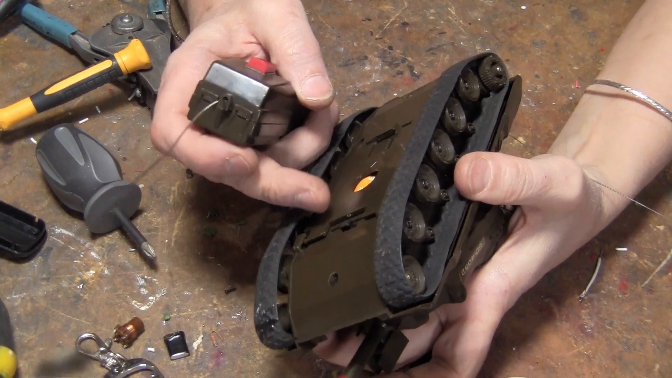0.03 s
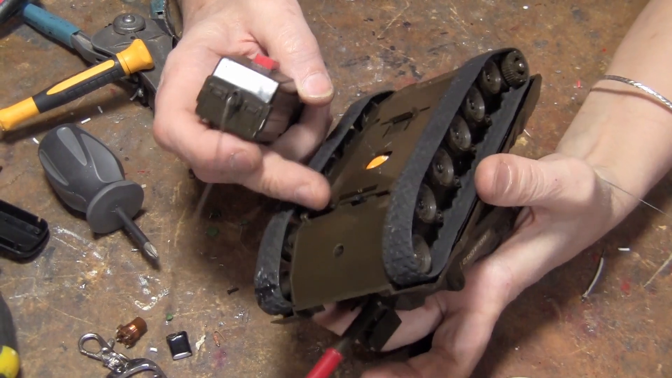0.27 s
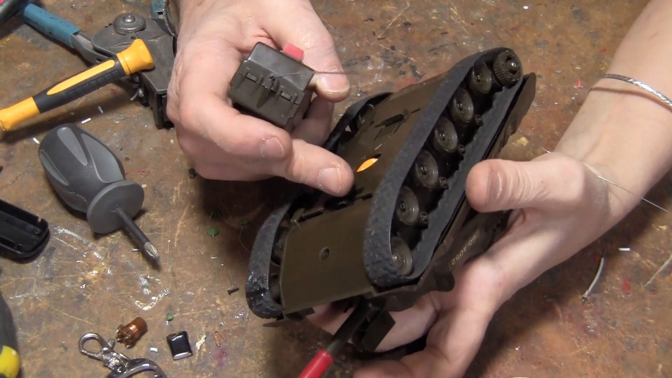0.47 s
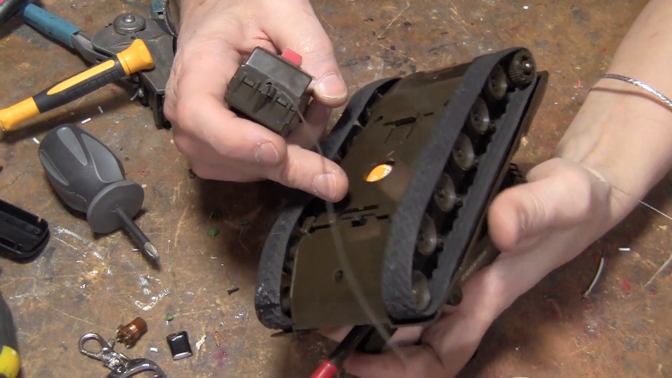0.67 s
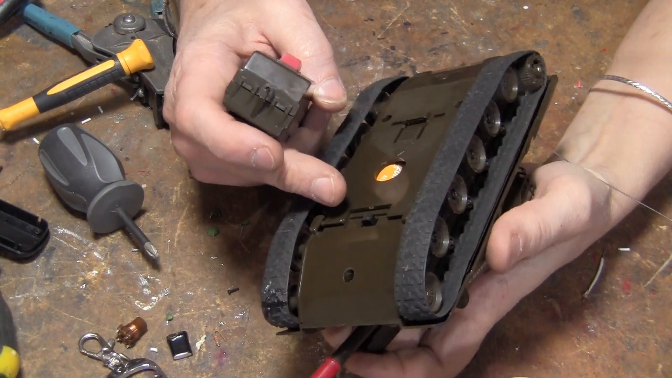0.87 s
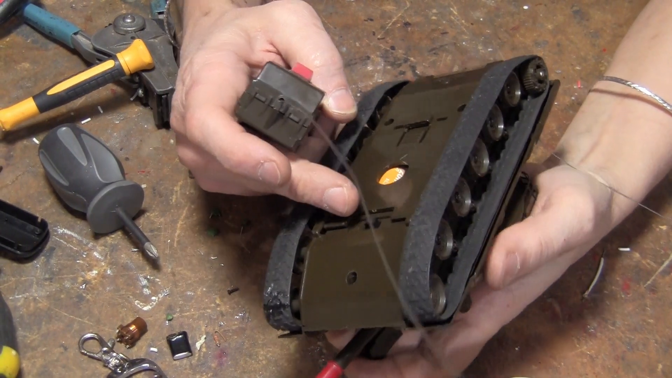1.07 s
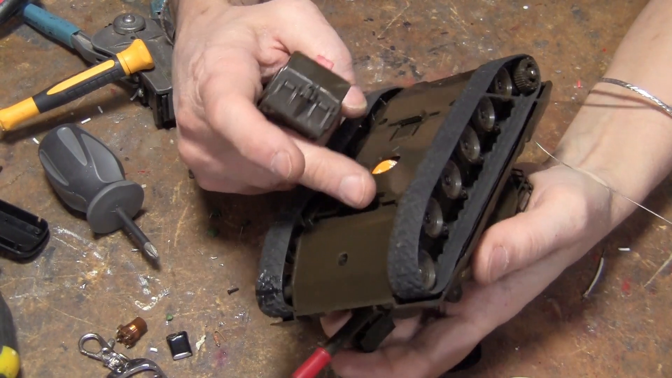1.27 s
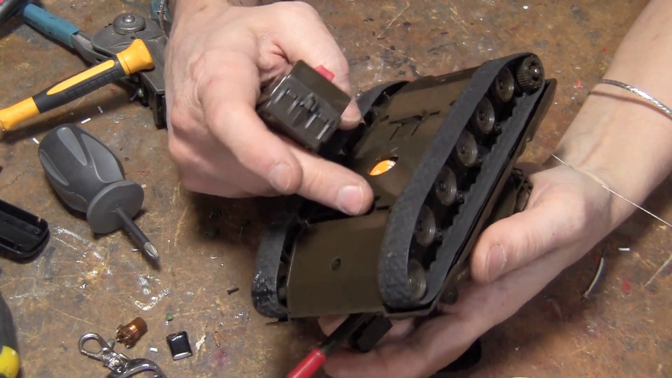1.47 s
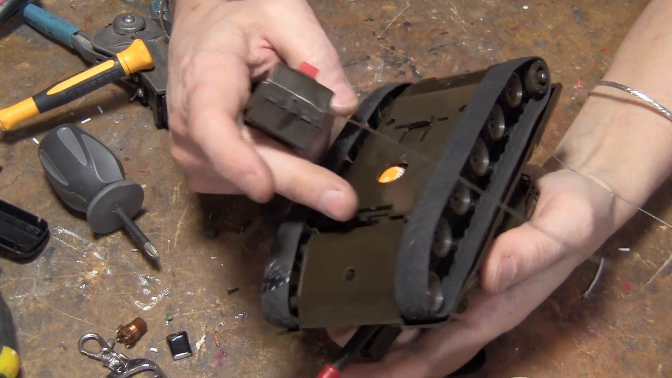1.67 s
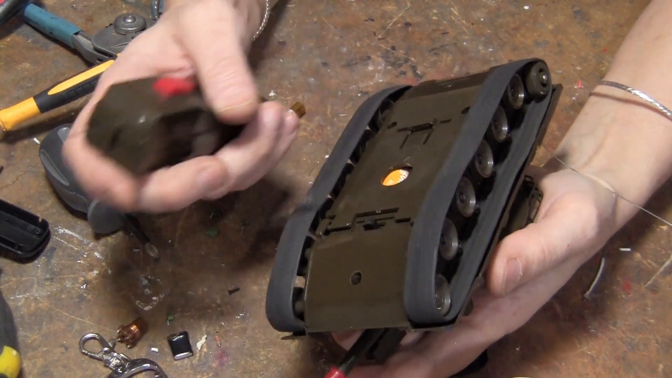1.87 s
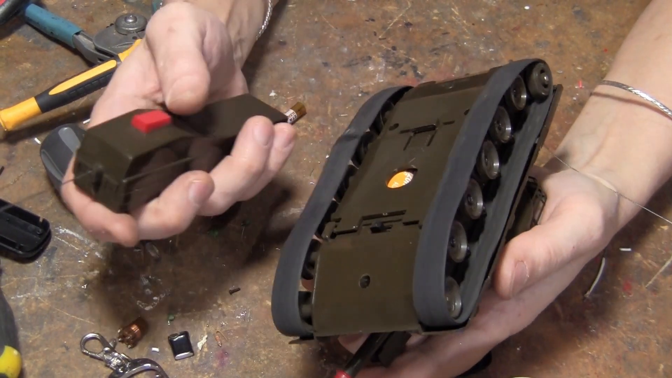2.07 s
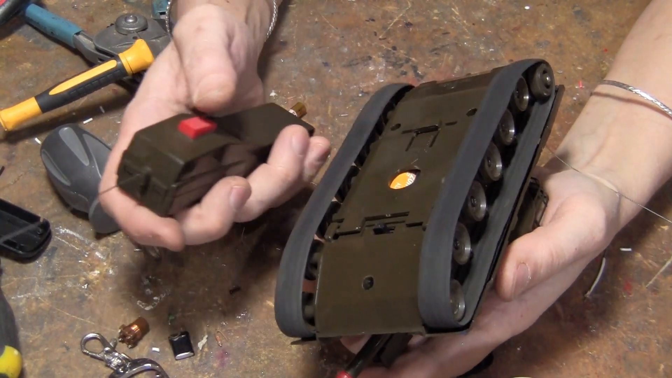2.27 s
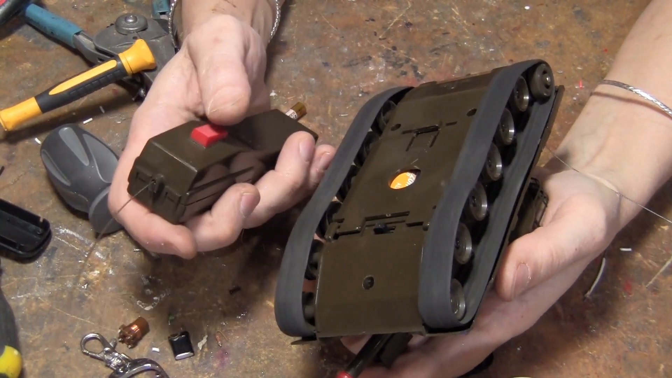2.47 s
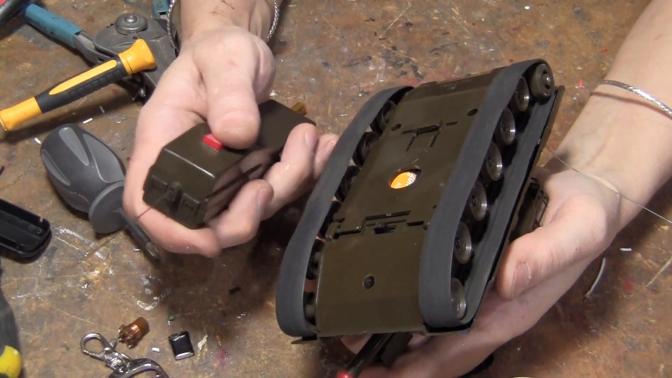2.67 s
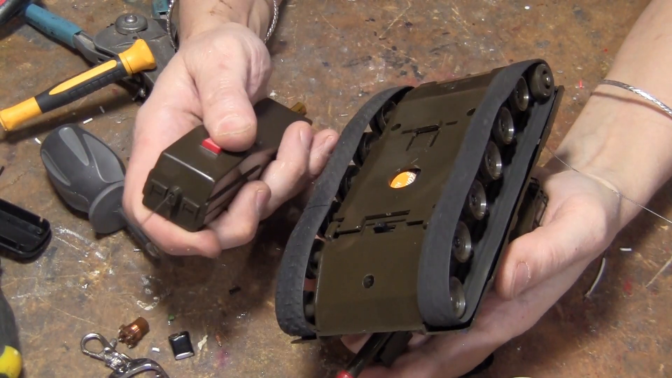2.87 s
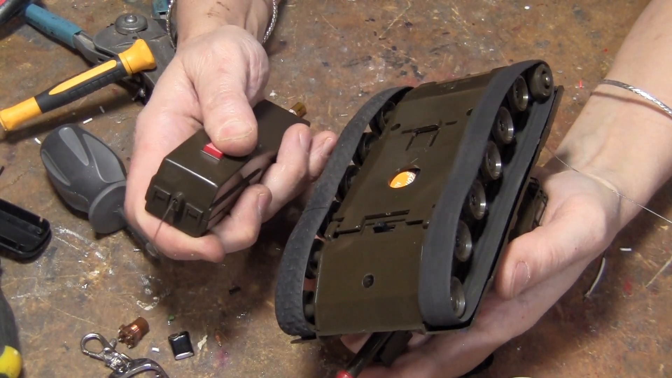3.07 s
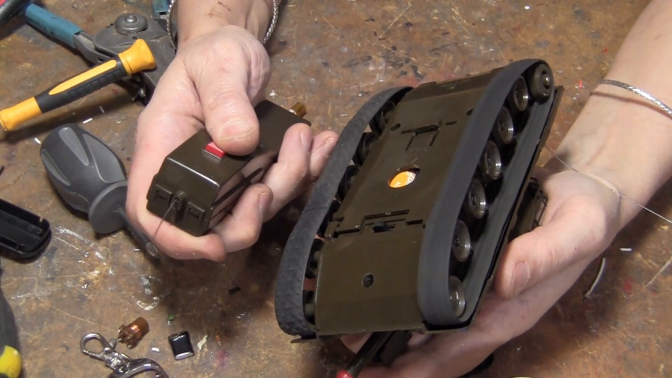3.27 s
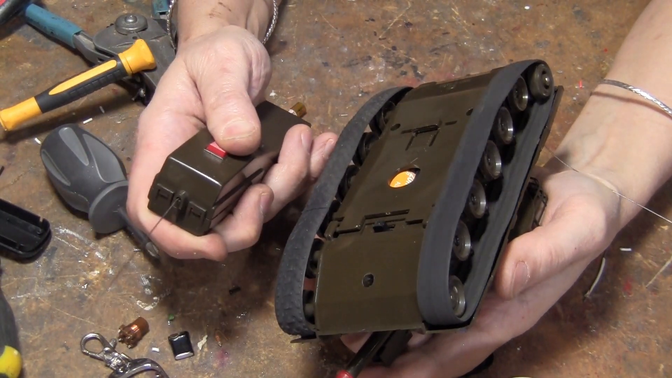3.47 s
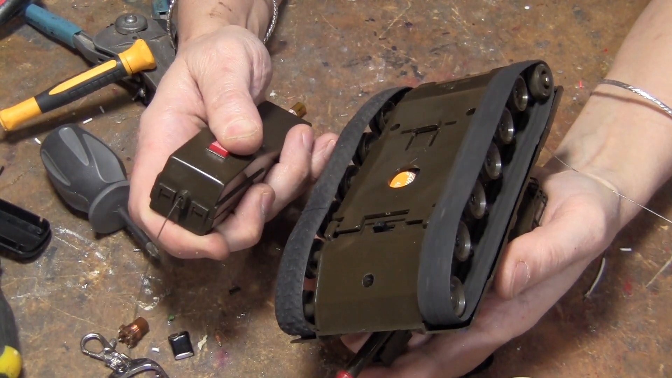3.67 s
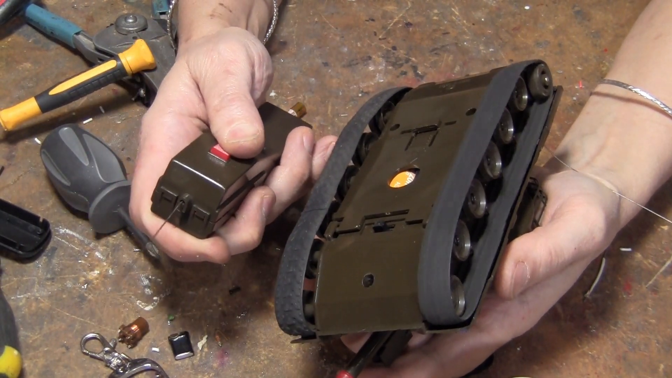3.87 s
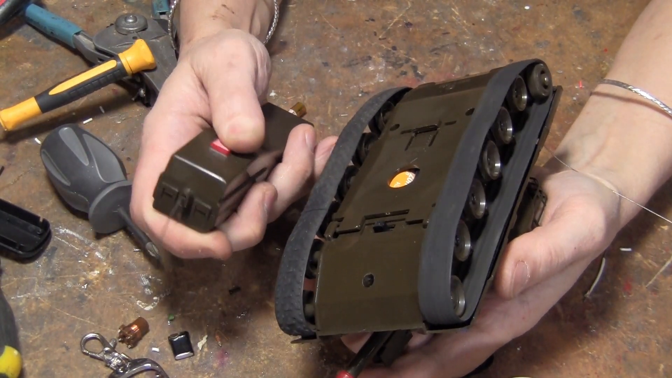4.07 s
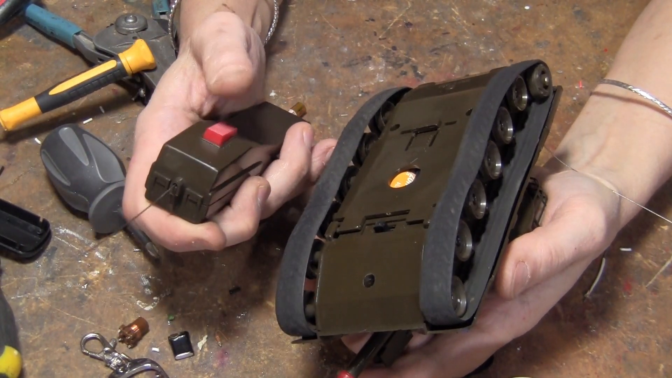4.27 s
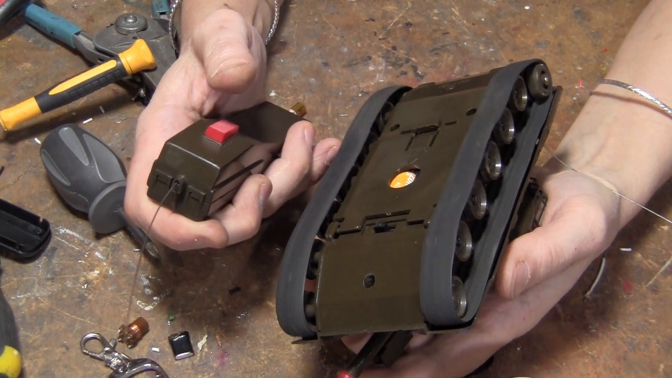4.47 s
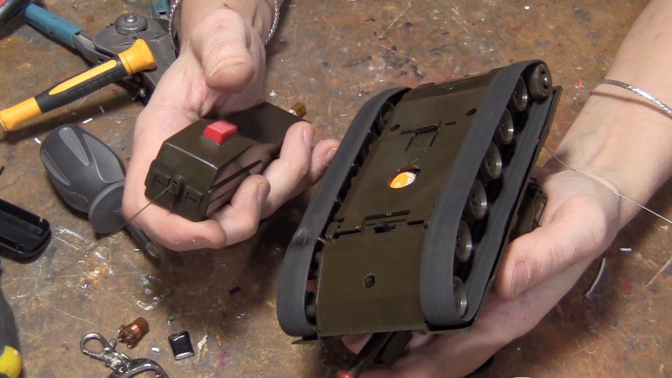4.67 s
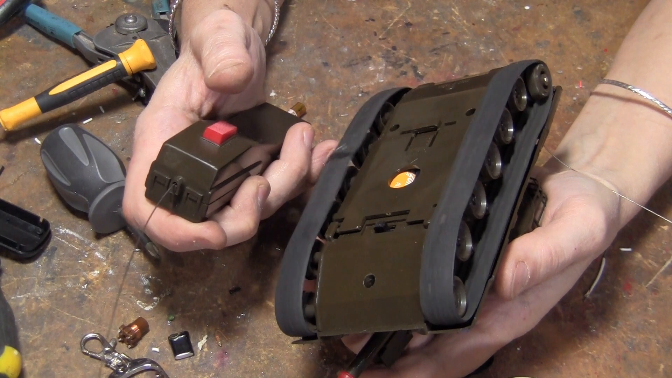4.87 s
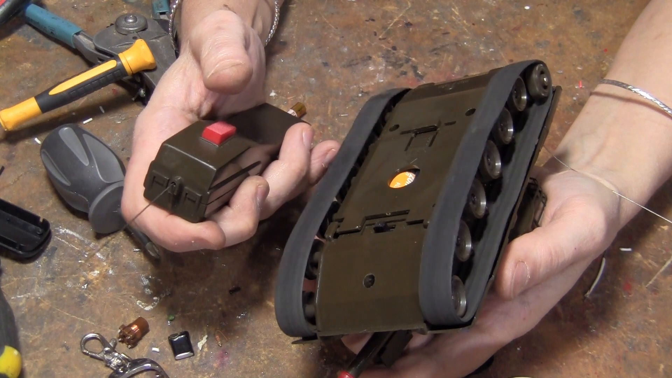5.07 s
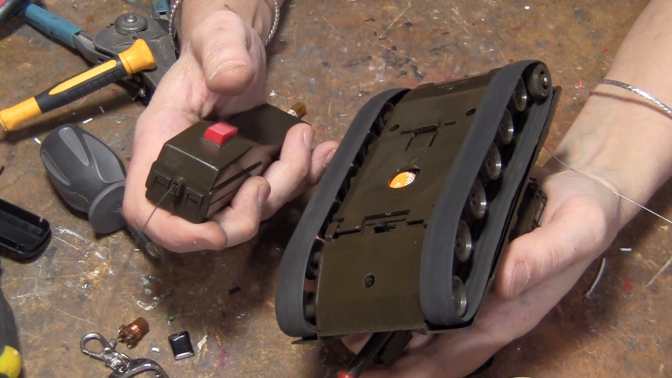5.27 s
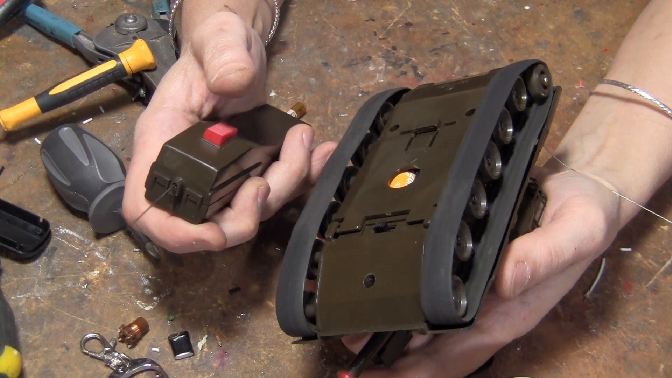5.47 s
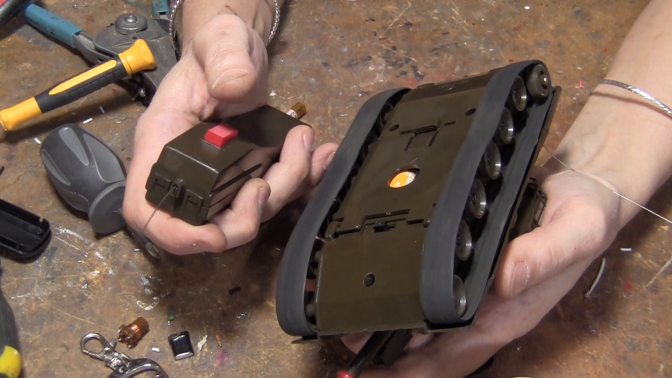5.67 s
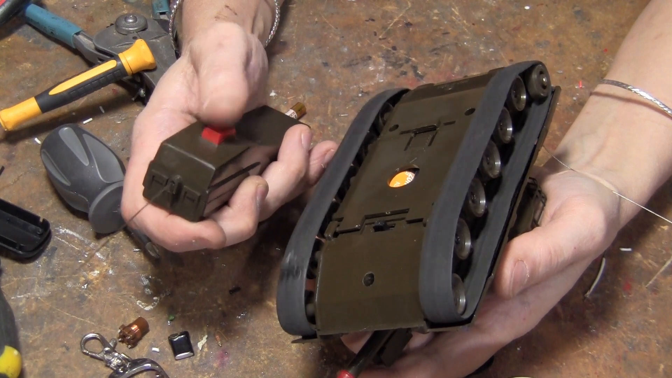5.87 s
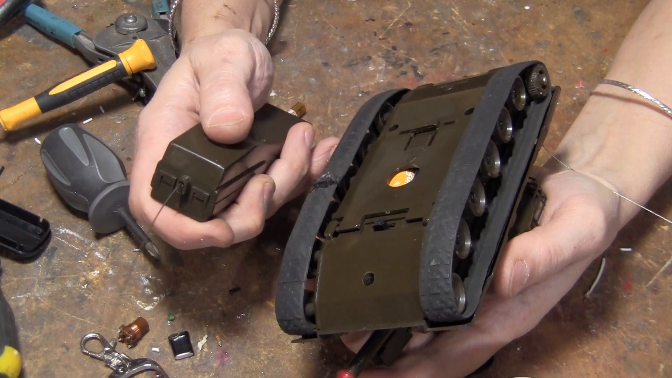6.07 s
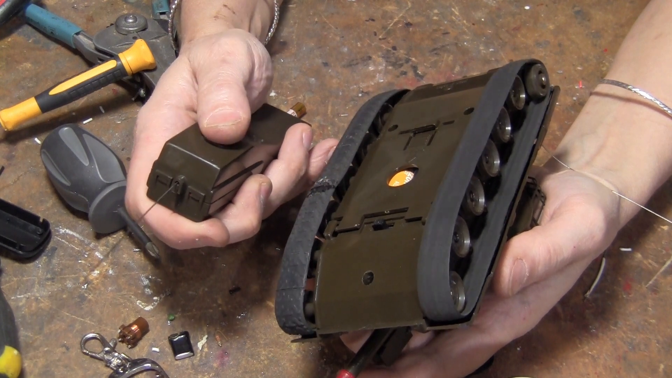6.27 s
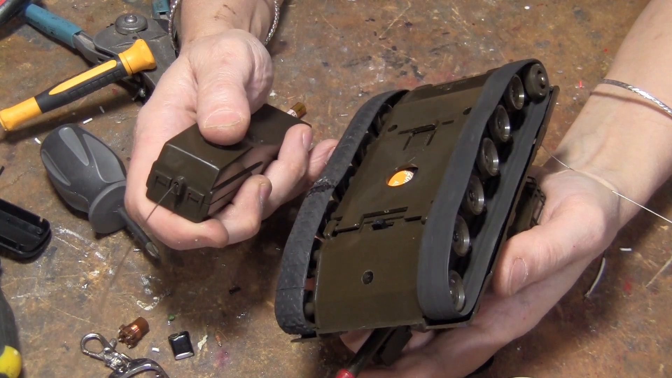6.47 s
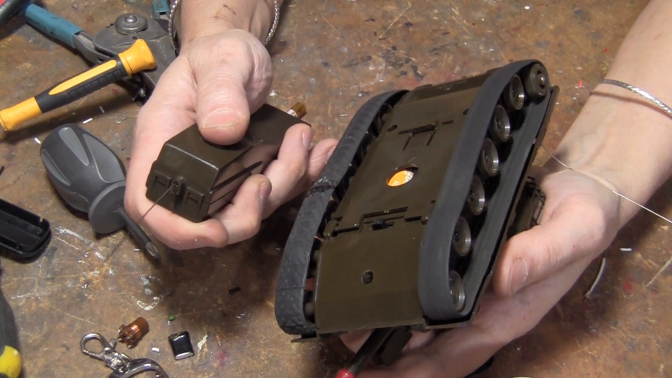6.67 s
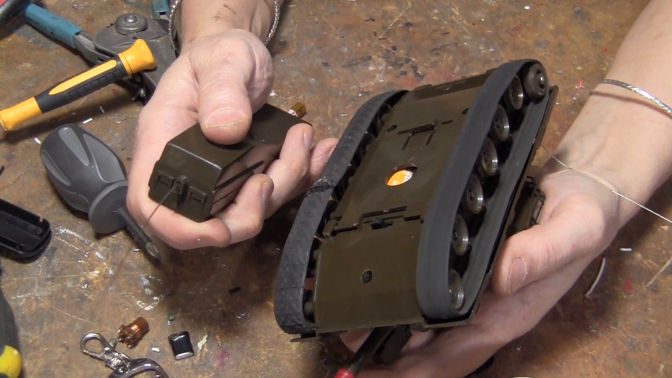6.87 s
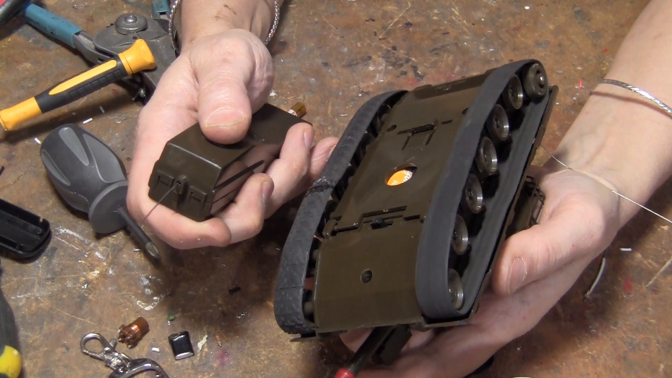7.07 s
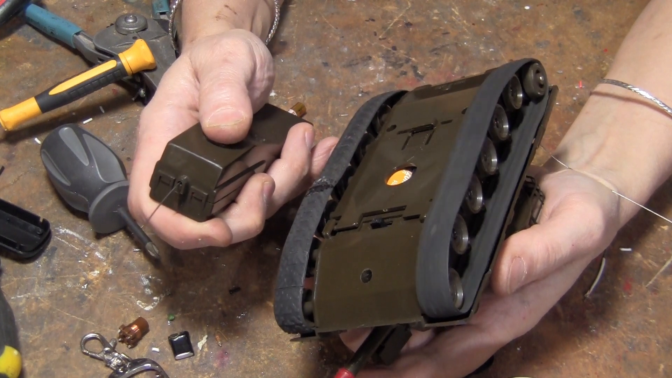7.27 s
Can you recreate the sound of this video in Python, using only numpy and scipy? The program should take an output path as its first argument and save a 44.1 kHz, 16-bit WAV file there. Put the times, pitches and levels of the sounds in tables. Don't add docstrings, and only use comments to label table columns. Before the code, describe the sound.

Close, dry handling clicks and a tiny squeak lead into whining, rattling little motors that tick sharply one way and softly in reverse.

```python
import sys
import numpy as np
from scipy import signal
from scipy.fft import rfft, irfft, next_fast_len
from scipy.io import wavfile
from scipy.ndimage import uniform_filter1d, map_coordinates

SR = 44100
rng = np.random.default_rng(int(sys.argv[2]) if len(sys.argv) > 2 else 0)


def magnitude_from_level(level_db):
    exponent = np.asarray(level_db, float) / 20
    return 10 ** exponent


def to_wav(sig):
    pcm = np.clip(np.atleast_2d(sig), -1, 1) * 32767
    pcm = np.round(pcm).astype(np.int16)
    wavfile.write(sys.argv[1], SR, pcm.T)


N = 323649
T = np.arange(N) / SR

# [start t/s, stop t/s, hull rattle level/dB, speed at the first bite f/Hz, rise time t/s]
RUNS = [
    (1.611, 2.776, -37, 30, .13),
    (2.812, 4.256, -38.5, 81.97, 0.078),
    (4.285, 6.113, -39, 62.13, 0.045),
    (6.15, 7.4, -37.5, 104, 0.072),
]
# [t/s, peak level/dB]
HARD_SNAPS = [(1.7347, -10.5), (1.847, -13.5), (1.9216, -15), (1.9893, -17), (2.0623, -15), (2.1314, -17.5),
              (2.1948, -15.5), (2.2591, -15.5), (2.3163, -18), (2.3695, -15.5), (2.4304, -20), (2.496, -18),
              (2.5572, -16), (2.6255, -20.5), (2.6939, -16), (2.758, -17.5)]
HARD_SNAPS_AGAIN = [(4.4257, -12), (4.5023, -13.5), (4.5686, -16), (4.631, -17), (4.6916, -16.5),
                    (4.753, -18.5), (4.8156, -18), (4.8795, -17.5), (4.9495, -18), (5.0176, -16.5),
                    (5.0831, -17.5), (5.1491, -18.5), (5.2122, -17), (5.2708, -16.5), (5.3337, -18),
                    (5.3961, -18.5), (5.4554, -17), (5.5233, -15.5), (5.5962, -18), (5.66, -17),
                    (5.7273, -17), (5.7938, -19.5), (5.852, -17), (5.914, -16.5), (5.9801, -16.5),
                    (6.039, -17), (6.106, -19.5)]


def unit(x):
    return x / np.sqrt(np.mean(x ** 2) + 1e-20)


def along(points, hz):
    f, db = np.transpose(points)
    return magnitude_from_level(np.interp(np.log(hz + 1), np.log(f), db, left=-120, right=-120))


def wobble(rate):
    return map_coordinates(rng.standard_normal(int(N * rate / SR) + 4), [T * rate])


def noise():
    return rng.standard_normal(N)


def filtered(x, response):
    m = next_fast_len(N + 8192)
    return irfft(rfft(x, m) * response(np.fft.rfftfreq(m, 1 / SR)), m)[:N]


def add(track, s, sound):
    part = track[round(s * SR):][:len(sound)]
    part += sound[:len(part)]


def decay(t, t60):
    return magnitude_from_level(-60 * t / t60)


def room():
    # [f/Hz, level/dB per Hz]
    room_tone = [(12, -41.5), (20, -3.5), (63, -7), (135, -28.5), (151, -34), (184, -18.5), (206, -31),
                 (244, -36), (273, -28), (551, -32), (1110, -36.5), (2510, -45), (10800, -56),
                 (14700, -44.5), (16500, -56)]
    air = magnitude_from_level(-63 + 1.4 * wobble(3.075)) * unit(filtered(noise(), lambda f: along(room_tone, f)))
    mains = magnitude_from_level(-68.5 + 3.0 * wobble(6)) * np.sin(2 * np.pi * 59.75 * T)
    return air + mains


def arch(s, length):
    return np.sin(np.pi * np.clip((T - s) / length, 0, 1)) ** 2


def rubbing():
    # [start t/s, length t/s, panel level/dB, scuff level over it/dB]
    strokes = [(-.12, .31, -58, -2.5), (0.129, 0.12, -46, -7.5), (0.221, 0.19, -60, -4),
               (.385, 0.046, -52, -8), (0.502, 0.125, -71, -12.5), (0.661, 0.33, -57.5, -11.5),
               (0.941, 0.365, -73, -9), (1.079, 0.18, -61, -8.5), (1.276, 0.16, -76, -5),
               (1.462, 0.102, -73, 11.5)]
    # [start t/s, length t/s, level/dB]
    palm_shifts = [
        (-.08, 0.27, -61.5),
        (0.258, 0.13, -60),
    ]
    # [f/Hz, level/dB per Hz]
    panel_tone = [(150, -46), (250, -8.5), (671, -10), (844, 2.5), (1400, 2), (2790, -24), (3000, -20),
                  (3900, -43), (6600, -120)]
    scuff_tone = [(1290, -22), (2200, -3), (2800, -10), (3950, -7.5), (5110, -16.5), (6400, -17.5),
                  (15000, -45.5)]
    palm_tone = [(30, -8), (70, -1), (200, -6), (550, -5), (900, -28)]
    edge_softness = 1.07
    grain = magnitude_from_level(3.0 * wobble(400) + 2.3 * wobble(49.8))
    panel = unit(filtered(noise() * grain, lambda f: along(panel_tone, f)))
    scuff = unit(filtered(noise() * grain, lambda f: along(scuff_tone, f)))
    palm = unit(filtered(noise() * grain, lambda f: along(palm_tone, f)))
    out = np.zeros(N)
    for s, length, db, scuff_db in strokes:
        press = magnitude_from_level(db) * arch(s, length) ** (edge_softness / 2)
        out += press * (panel + magnitude_from_level(scuff_db) * scuff)
    for s, length, db in palm_shifts:
        out += magnitude_from_level(db) * arch(s, length) * palm
    return out


def clicks():
    # [t/s, peak level/dB, panel pitch f/Hz, crack level over the peak/dB]
    click_times = [(0.012, -40.5, 3130, -25), (0.187, -36.5, 1150, -28), (0.202, -41, 1510, -32),
                   (0.26, -44, 2190, -31), (0.478, -62, 2250, -30), (0.507, -66, 1150, -10),
                   (0.574, -59, 1520, -28), (0.661, -32.5, 3520, -16), (0.676, -30, 1239, -26),
                   (0.732, -41.5, 1670, -28), (0.807, -34, 1050, -32), (0.883, -32.5, 1350, -30),
                   (1.047, -71.5, 1106, -24), (1.107, -28.5, 1744, -33.5), (1.13, -35.5, 1080, -26),
                   (1.156, -47, 830, -27), (1.22, -64, 824, -18), (1.282, -63, 1120, -10),
                   (1.318, -54, 2250, -28), (1.378, -58, 2270, -15), (1.415, -48.5, 1105, -20),
                   (1.465, -35.5, 1240, -21), (1.47, -24.5, 3800, -21), (1.523, -39.5, 3910, -15),
                   (1.618, -45, 895, -20), (1.646, -29.5, 1930, -25)]
    # [pitch ratio, level/dB]
    panel_modes = [(1, 0), (1.65, -10), (.68, -7), (2.3, -13)]
    out, t = np.zeros(N), np.arange(SR // 6) / SR
    shell_band = signal.butter(2, [750, 4500], 'band', fs=SR)
    for s, db, hz, crack_db in click_times:
        t60 = .024 * (1000 / hz) ** .4
        ring = np.zeros(len(t))
        for ratio, mode_db in panel_modes:
            ring += magnitude_from_level(mode_db + rng.normal(0, 2.0)) * np.sin(2 * np.pi * ratio * hz * t)
        ring *= magnitude_from_level(-.8) * decay(t, t60)
        shell_noise, crack_noise = rng.standard_normal((2, len(t)))
        shell = signal.lfilter(*shell_band, shell_noise)
        body = shell * (0.64 * decay(t, 0.015) + 0.13 * decay(t, 0.15))
        crack = magnitude_from_level(crack_db) * np.diff(crack_noise, prepend=0) * decay(t, 0.0041)
        onset = 1 - np.exp(-t / 0.0002)
        add(out, s, magnitude_from_level(db + 0.5) * (ring + body + 0.26 * crack) * onset)
    return out


def squeak():
    # [t/s, level/dB, f/Hz]
    slips = [
        (.303, -46, 3230),
        (.316, -44.5, 2930),
        (.328, -52, 2944),
        (.342, -50.5, 3050),
        (.349, -53, 2930),
    ]
    out, t = np.zeros(N), np.arange(SR // 6) / SR
    for s, db, hz in slips:
        pair = np.sin(2 * np.pi * hz * t) + 0.86 * np.sin(2 * np.pi * 1.411 * hz * t)
        add(out, s, magnitude_from_level(db) * decay(t, 0.044) * (1 - np.exp(-t / 0.00125)) * pair)
    return out


def run_now():
    return np.clip(np.searchsorted([run[0] for run in RUNS], T) - 1, 0, None)


def speed():
    # [t/s, f/Hz]
    load_curves = [
        [(1.918, 151), (2.028, 143.4), (2.242, 162.5), (2.35, 173), (2.43, 157.4), (2.53, 166.7),
         (2.608, 147.3), (2.78, 160)],
        [(3.006, 156.4), (3.104, 163), (3.704, 162.2), (3.846, 170.4), (3.882, 159.7), (4.218, 162.1),
         (4.27, 144.4)],
        [(4.616, 174), (4.798, 173.5), (4.894, 150.7), (5.1, 152), (5.206, 170.7), (5.418, 168.8),
         (5.52, 140.1), (5.604, 156.5), (6.108, 156.4)],
        [(6.35, 160.1), (6.482, 150.3), (6.624, 165.1), (7.152, 157.5), (7.222, 167), (7.33, 154)],
    ]
    climb_hz_per_s = 350
    speeds = []
    for (start, _, _, first_hz, _), curve in zip(RUNS, load_curves):
        s, load_hz = np.transpose(curve)
        speeds.append(np.clip(first_hz + climb_hz_per_s * (T - start), 0, np.interp(T, s, load_hz)))
    return np.choose(run_now(), speeds)


def slowness():
    return np.clip(1 - speed() / 155, 0, 1)


def modes(f):
    # [f/Hz, width f/Hz, level/dB]
    hull_modes = [(455, 37, -10), (830, 46, -0.5), (1066, 157, -2), (1396, 136, -2.5), (1564, 530, -7.5),
                  (2595, 160, -3), (3998, 315, -3), (4440, 55, 1), (4900, 220, -3), (6021, 646, -3),
                  (7435, 590, -4), (10227, 790, 0), (12170, 610, -0.5)]
    power = sum(magnitude_from_level(db) ** 2 / (1 + (2 * (f - hz) / w) ** 2) for hz, w, db in hull_modes)
    return np.sqrt(0.075 + power)


def above(f, hz):
    return 1 / (1 + (hz / (f + 1)) ** 8)


def gears():
    # [f/Hz, level/dB per Hz]
    teeth_tone = [(88, -48), (150, -29.5), (329, -26), (488, -7.5), (583, -14.5), (830, -5), (3160, -6),
                  (4420, -6.5), (12500, -27), (15600, -30), (16500, -66.5)]
    # [t/s, depth level/dB, width t/s]
    snags = [
        (2.27, 3.5, 0.093),
        (3.8, 2.5, 0.023),
        (6.8, 2.5, 0.025),
    ]
    rattle, way = np.zeros(N), run_now() % 2
    for start, stop, db, _, rise in RUNS:
        after = np.clip(T - stop, 0, None)
        fall_db = np.maximum(-606 * after, -15.5 - 44.5 * after)
        rattle += magnitude_from_level(db + fall_db) * (1 - np.exp(-np.clip(T - start, 0, None) / rise))
    buzz_db = np.choose(way, (2.5, 1.03))
    hiss_db = np.choose(way, (-5, -6.5)) - np.choose(way, (14, 6)) * slowness()
    snag_db = sum(db * np.exp(-((T - s) / width) ** 2) for s, db, width in snags)
    strikes = noise() * magnitude_from_level(1.34 * wobble(900) + 1.04 * wobble(90) + 1.08 * wobble(20))
    hull = filtered(strikes, lambda f: along(teeth_tone, f) * modes(f))
    low = unit(filtered(hull, lambda f: 1 - above(f, 2889)))
    buzz = unit(filtered(hull, lambda f: above(f, 3330) - above(f, 5790)))
    hiss = unit(filtered(hull, lambda f: above(f, 7000)))
    parts = magnitude_from_level(1.54) * low
    parts += magnitude_from_level(buzz_db + 0.47 * wobble(25)) * buzz
    parts += magnitude_from_level(hiss_db + 1.47 * wobble(25)) * hiss
    return rattle * magnitude_from_level(-snag_db) * parts


def shafts():
    # [multiple of the tooth rate, level/dB]
    mesh_tones = [(1, 0), (2, -7), (3, -3), (4, -7), (5, -5), (6, -6), (7, -9)]
    pinion_teeth, poles = 11, 3
    speed_hz, slow, way = speed(), slowness(), run_now() % 2
    on = np.zeros(N)
    for start, stop, *_ in RUNS:
        on += np.clip(np.minimum((T - start) / .1, (stop - T) / 0.014), 0, 1)
    unsteady = 1 + (.003 + .025 * slow) * wobble(60) + .008 * wobble(13)
    turn = 2 * np.pi * np.cumsum(speed_hz * unsteady) / SR
    whine_db = np.choose(way, (-49.5, -54)) + 7 * slow - .24 * np.clip(speed_hz - 146, 0, None)
    teeth = sum(magnitude_from_level(db + 2.8 * wobble(30)) * np.sin(k * pinion_teeth * turn) for k, db in mesh_tones)

    def through_hull(f):
        return np.sqrt(modes(f)) / (1 + (f / 5400) ** 12 + (760 / (f + 1)) ** 8)

    whine = filtered(on * magnitude_from_level(whine_db + 2.3 * wobble(40)) * teeth, through_hull)
    hum = magnitude_from_level(np.choose(way, (-66, -60)) + 2.2 * wobble(30)) * np.sin(poles * turn)
    hum += magnitude_from_level(np.choose(way, (-81, -72.5)) + 1.1 * wobble(20)) * np.sin(turn)
    return np.sqrt(2) * (whine + on * magnitude_from_level(-50 * slow) * hum)


def snaps(rows, colour, length, boost_db, knock_db):
    # [f/Hz, level/dB]
    knock_tone = [(900, -13.5), (2500, -20), (3500, -5), (5000, 9), (6500, 1)]
    thud_hz, thud_db = 450, -24
    bright, dull, thud = np.zeros((3, N))
    t = np.arange(SR // 50) / SR
    u = t / length
    swell = u * np.exp(1 - u) + 0.067 * decay(t, 0.063)
    jump = thud_hz * t * np.exp(-2 * np.pi * thud_hz * t)
    for s, db in rows:
        burst_signs, knock_signs = np.sign(rng.standard_normal((2, len(t))))
        knock_gain = magnitude_from_level(db + knock_db + 3 + 1.5 * rng.standard_normal())
        thud_gain = magnitude_from_level(db + thud_db + 3.5 * rng.standard_normal())
        add(bright, s, magnitude_from_level(db + boost_db) * swell * burst_signs)
        add(dull, s + .0006, knock_gain * decay(t, .0028) * knock_signs)
        add(thud, s + 0.00078, thud_gain * jump)
    burst = filtered(bright, lambda f: magnitude_from_level(-3.0) * along(colour, f))
    knock = filtered(dull, lambda f: magnitude_from_level(4) * along(knock_tone, f))
    return burst + knock + thud


def hard_snaps():
    # [f/Hz, level/dB]
    hard_tone = [(60, -17.5), (400, -27.5), (1500, -24.5), (3500, -5.5), (6000, -14.5), (8000, -1.5),
                 (11500, -6.5), (14000, -11), (17000, -38)]
    return snaps(HARD_SNAPS + HARD_SNAPS_AGAIN, hard_tone, 0.00053, boost_db=4.5, knock_db=-11.5)


def gain_control(depth_db, release_db):
    need = np.zeros(N)
    need[[round((s + .002) * SR) for s, _ in HARD_SNAPS + HARD_SNAPS_AGAIN]] = depth_db
    duck_db = np.maximum.accumulate(need + release_db * T) - release_db * T
    return magnitude_from_level(-uniform_filter1d(duck_db, size=60))


def soft_snaps():
    # [t/s, peak level/dB]
    first_reverse = [(2.9596, -34), (3.0284, -34), (3.0925, -22.5), (3.1487, -35), (3.206, -21),
                     (3.2634, -19), (3.3195, -31), (3.3778, -19.5), (3.438, -23), (3.5537, -22),
                     (3.6114, -20), (3.669, -33.5), (3.725, -27), (3.784, -19), (3.8373, -27.5),
                     (3.894, -20.5), (3.9546, -21), (4.0127, -34), (4.0706, -20.5), (4.131, -19),
                     (4.1878, -36.5), (4.259, -24)]
    second_reverse = [(6.2665, -26.5), (6.3446, -39.5), (6.401, -23), (6.4596, -25), (6.5836, -31),
                      (6.6436, -36.5), (6.7589, -32.5), (6.819, -24), (6.9369, -23), (6.9982, -25.5),
                      (7.0715, -30.5), (7.1782, -24), (7.2421, -34), (7.294, -32)]
    # [f/Hz, level/dB]
    soft_tone = [(3000, -30), (7000, -5.5), (9500, -5), (11000, -14), (12300, 0), (14000, -16.5),
                 (17000, -41)]
    return snaps(first_reverse + second_reverse, soft_tone, 0.00051, boost_db=1.5, knock_db=-12)


def scene():
    hands = rubbing() + clicks() + squeak()
    steady = (room() + gears()) * gain_control(depth_db=11, release_db=81)
    mono = steady + hands + shafts() + hard_snaps() + soft_snaps()
    return np.array([mono, mono])


def top_cut(x):
    return signal.sosfilt(signal.butter(12, 17150, fs=SR, output="sos"), x)


def record(dry):
    mix = .2 * np.tanh(dry / .2)
    return top_cut(mix)


dry = scene()
out = record(dry)
to_wav(out)
```